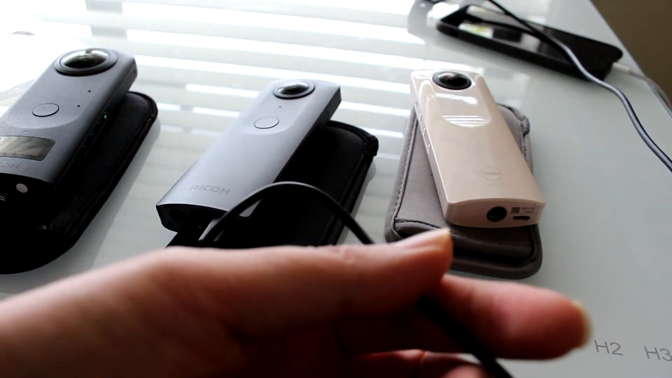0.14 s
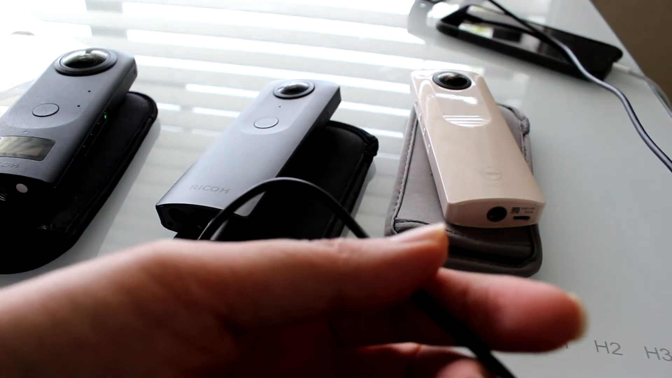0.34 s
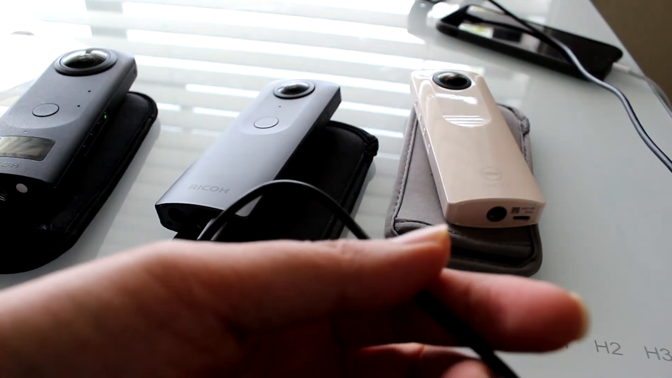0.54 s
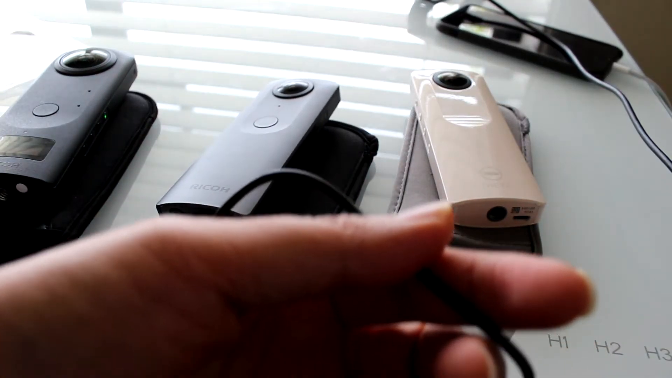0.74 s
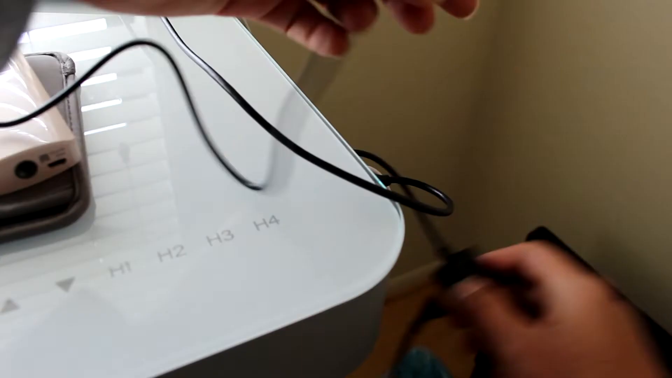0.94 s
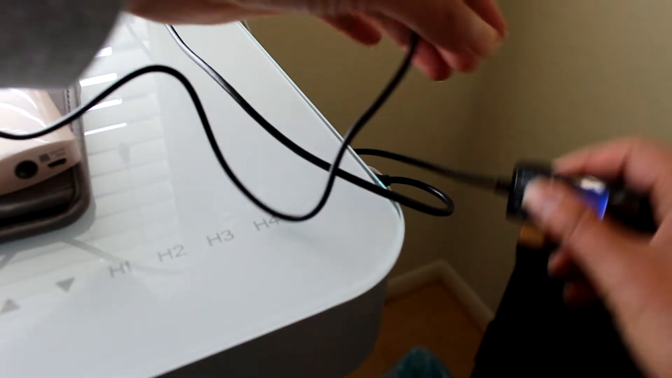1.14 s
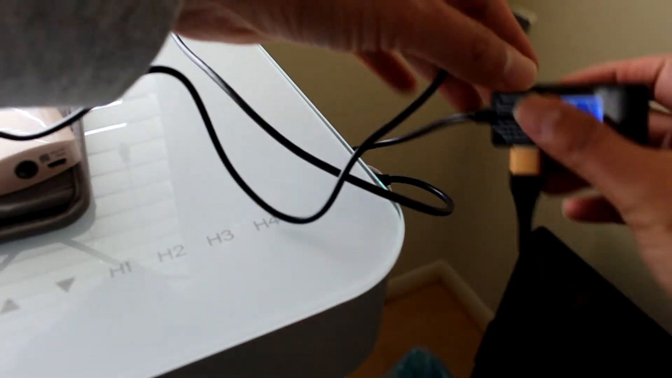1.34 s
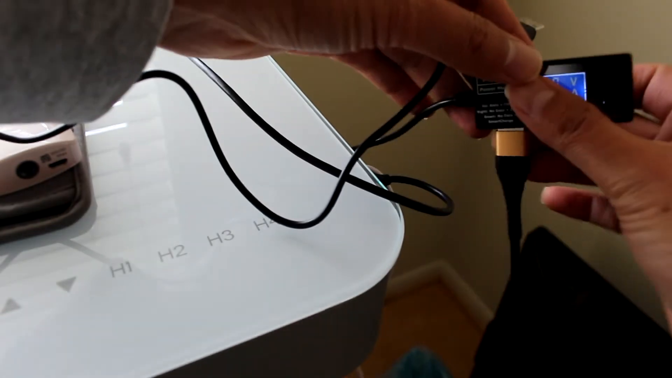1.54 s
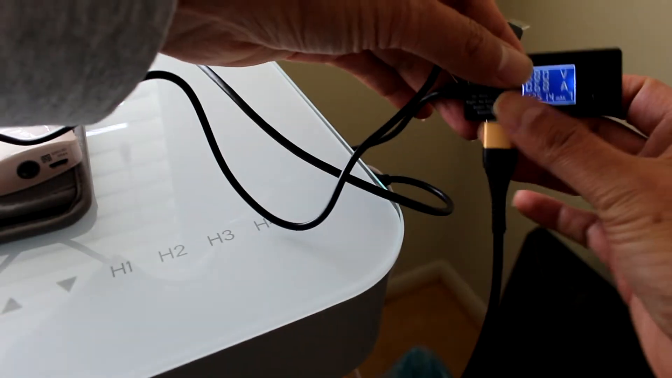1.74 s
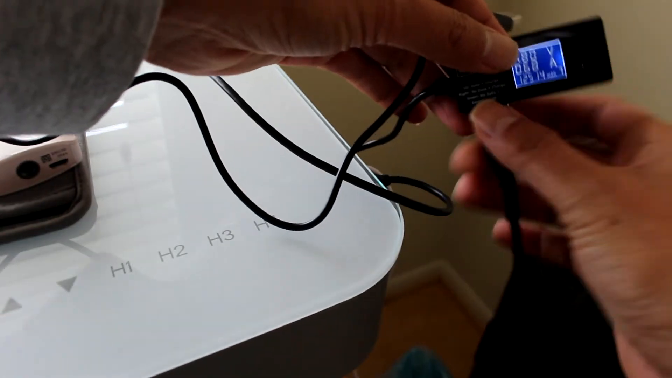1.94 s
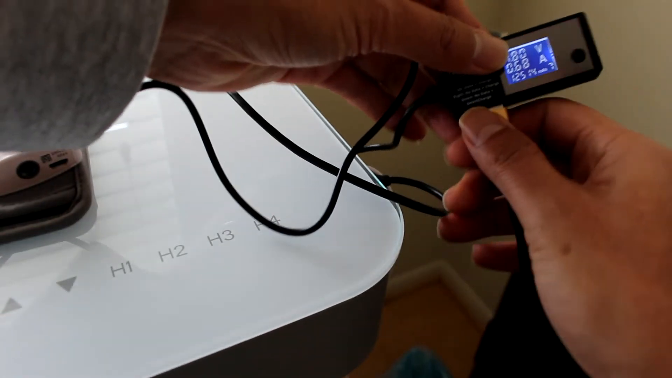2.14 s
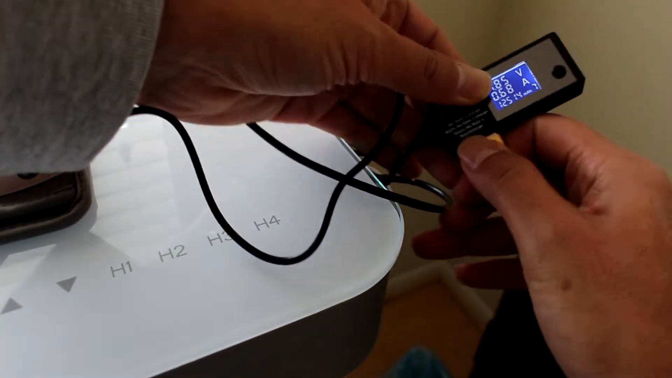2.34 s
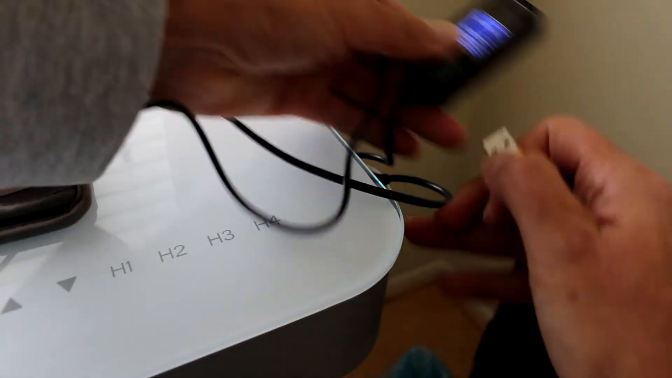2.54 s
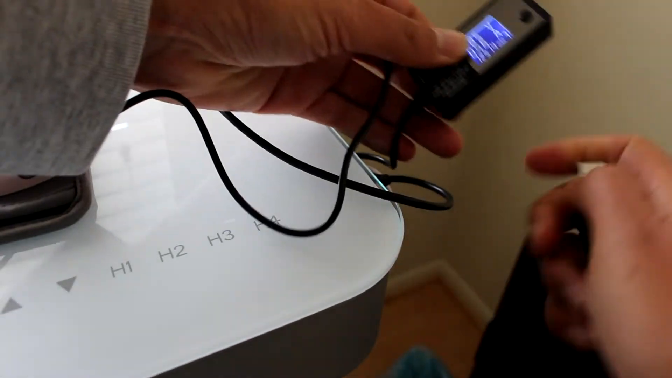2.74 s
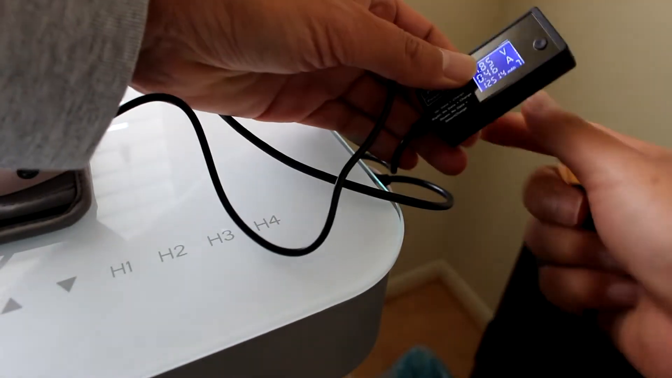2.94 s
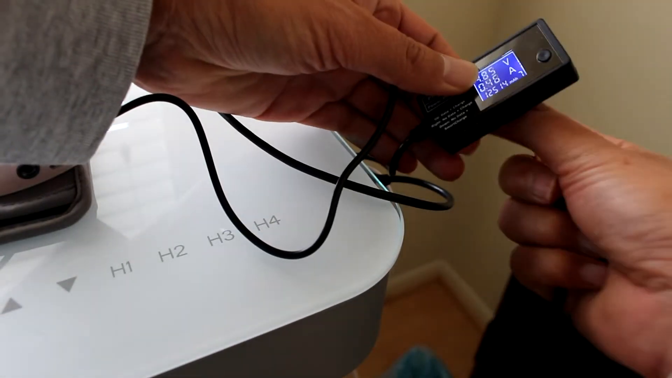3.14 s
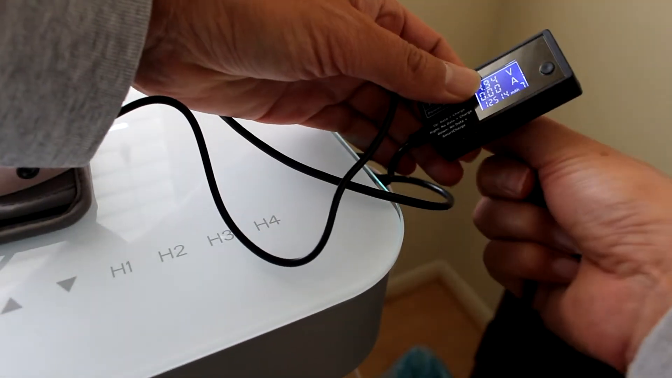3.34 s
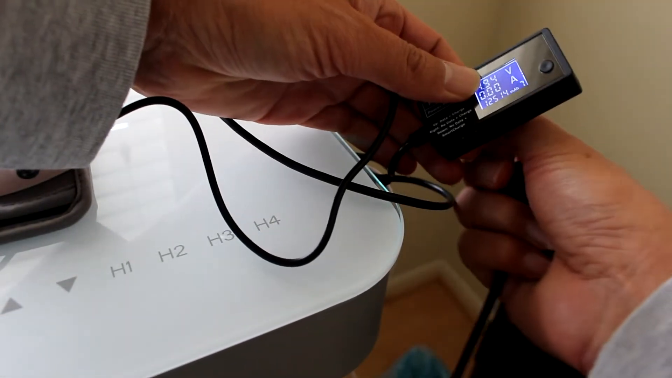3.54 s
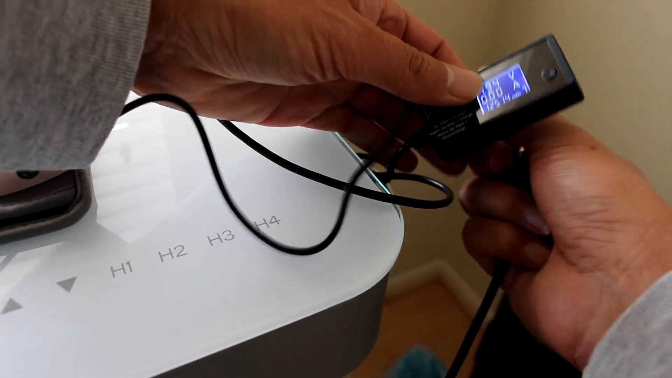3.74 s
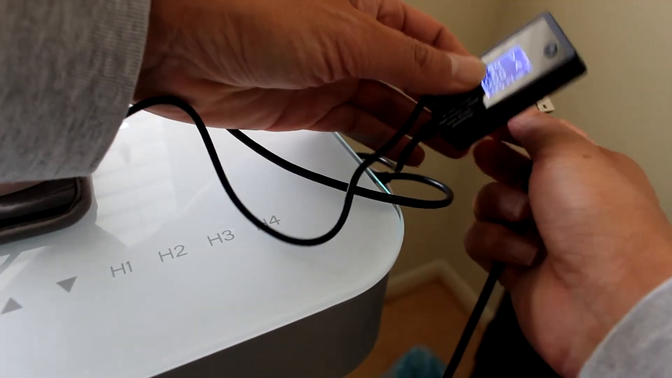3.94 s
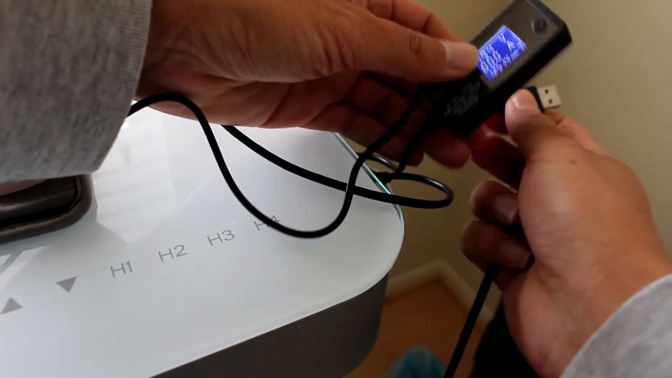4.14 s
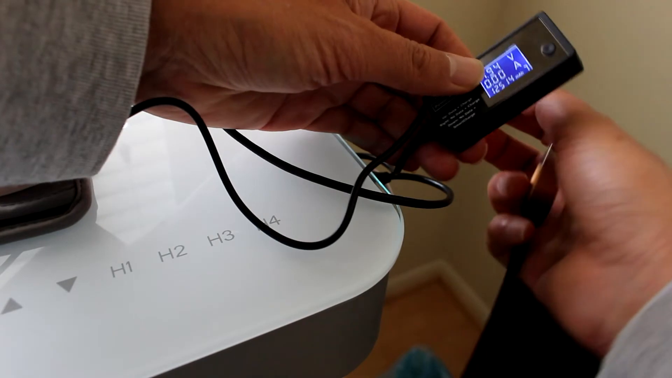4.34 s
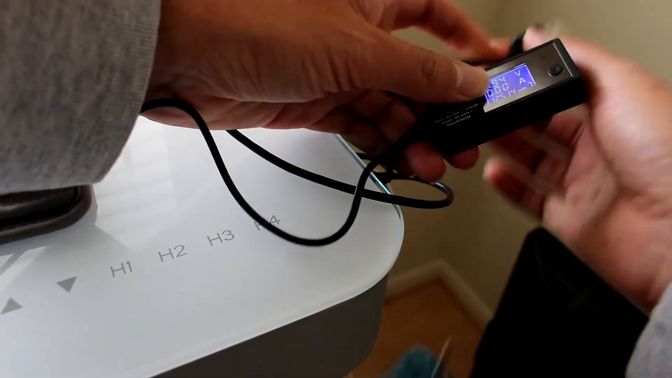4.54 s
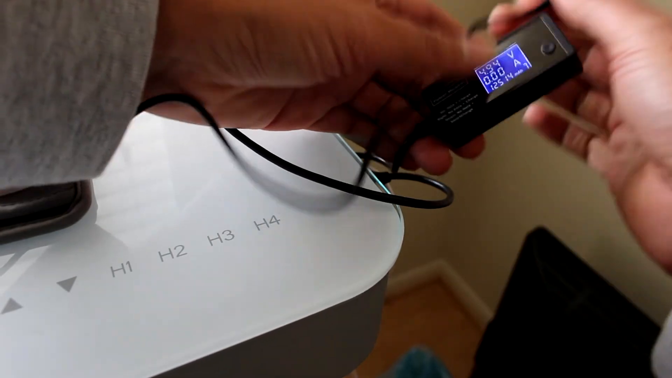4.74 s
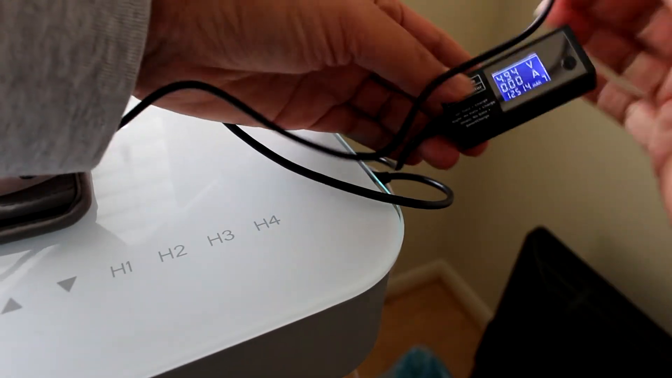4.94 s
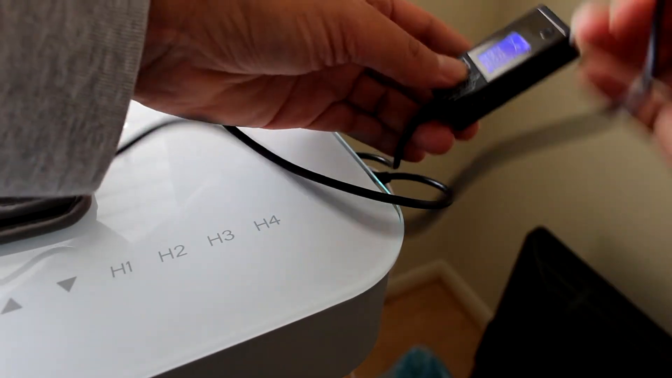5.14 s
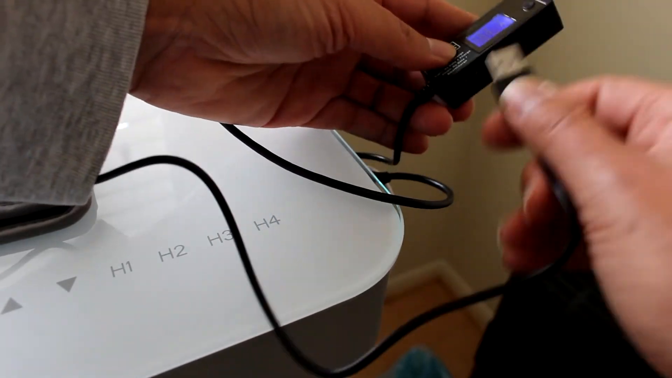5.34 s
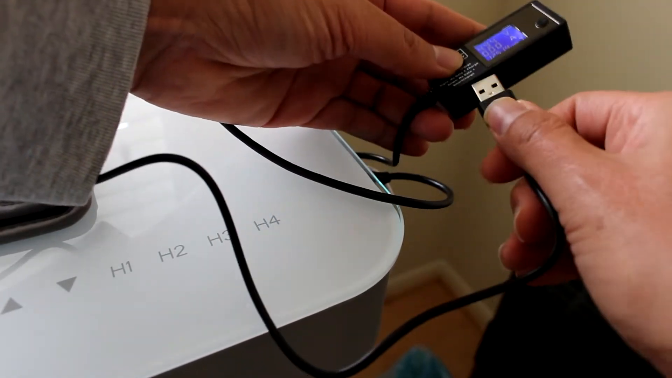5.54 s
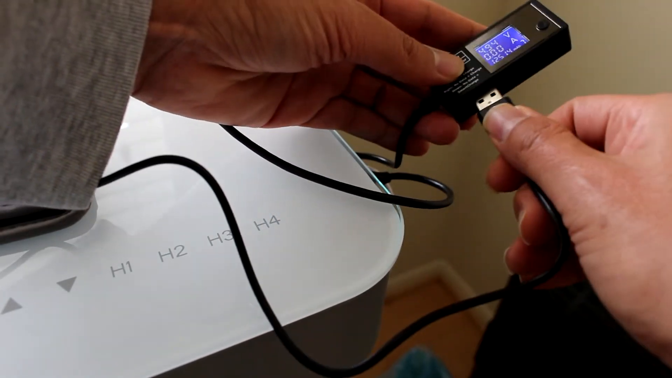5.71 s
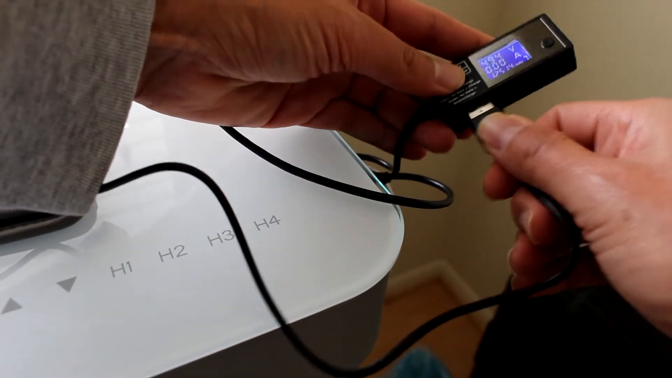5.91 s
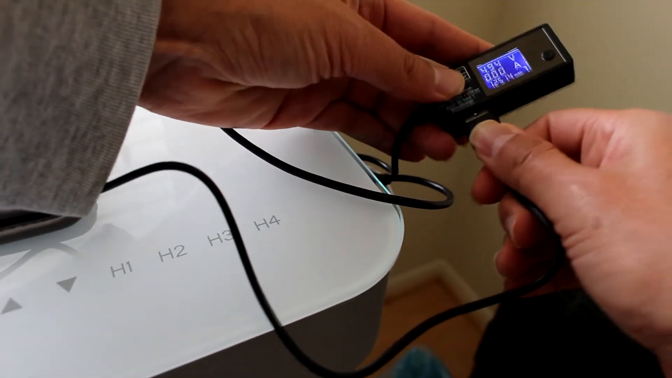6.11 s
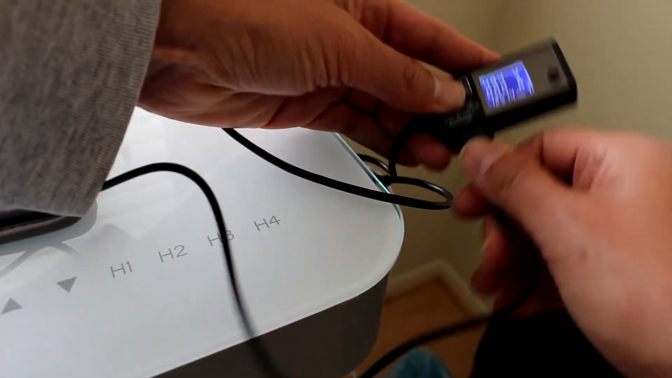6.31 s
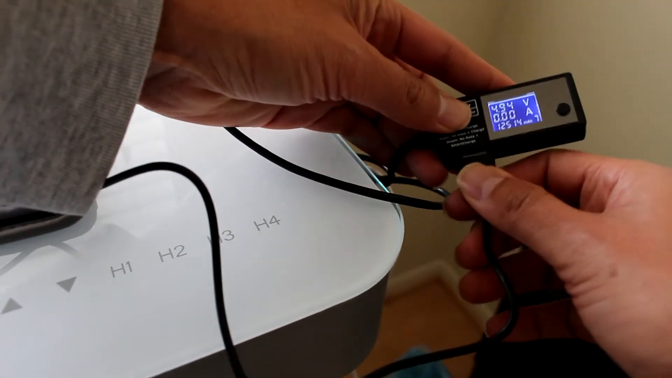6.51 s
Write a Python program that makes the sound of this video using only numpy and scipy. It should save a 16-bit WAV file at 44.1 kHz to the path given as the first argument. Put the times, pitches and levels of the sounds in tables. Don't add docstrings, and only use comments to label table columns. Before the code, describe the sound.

In a quiet, hard-walled room, a plug clicks and scrapes on a plastic shell while its loose cable slaps and drags across a glass table.

```python
import sys
import numpy as np
from scipy import signal
from scipy.fft import rfft, irfft, next_fast_len
from scipy.io import wavfile
from scipy.ndimage import map_coordinates

SR = 44100
rng = np.random.default_rng(int(sys.argv[2]) if len(sys.argv) > 2 else 0)


def store_wav(level_fs):
    pcm = np.round(np.clip(np.atleast_2d(level_fs), -1, 1) * 32767)
    wavfile.write(sys.argv[1], SR, pcm.T.astype(np.int16))


def to_linear_factor(level_db):
    exponent = np.asarray(level_db, float) / 20
    return 10 ** exponent


N = 294147

# (centre [Hz], width [Hz], level [dB])
EDGE_CRACK = [(5150, 16000, 51), (11100, 16000, -2.5), (12300, 850, -38)]
# (centre [Hz], width [Hz], level [dB])
TABLE_THUD = [(145, 127, 5), (340, 570, 4.5)]
# (frequency [Hz], likeness [0-1])
ROOM_LIKENESS = [(200, 0.98), (1500, 0.68), (4000, 0.54), (10000, 0.037)]


def unit(x):
    return x / np.sqrt(np.mean(x ** 2) + 1e-20)


def with_peak(x, db):
    return to_linear_factor(db) * x / np.abs(x).max()


def noise(*shape):
    return rng.standard_normal(shape)


def along(points, hz):
    f, v = np.transpose(points)
    return np.interp(np.log(hz + 1), np.log(f + 1), v)


def wobble(rate):
    return map_coordinates(noise(int(N * rate / SR) + 4), [np.arange(N) * rate / SR])


def filtered(x, response):
    m = next_fast_len(x.shape[-1] + 8192)
    spectrum = rfft(x, m) * response(np.fft.rfftfreq(m, 1 / SR))
    return irfft(spectrum, m)[..., :x.shape[-1]]


def modes(rows):
    def response(f):
        total = 0
        for k, (centre, width, db) in enumerate(rows):
            damping = 1j * f * width
            total = total + (-1) ** k * to_linear_factor(db) * damping / (centre * centre - f * f + damping)
        return total
    return response


def peaked(x, rows, db):
    return with_peak(filtered(x, lambda f: modes(rows)(f) ** 2), db)


def causal(x, points, tilt_db, db):
    hz = np.fft.rfftfreq(2048, 1 / SR)
    colour_db = along(points, hz) + tilt_db * np.log2(hz / 2000 + 0.068)
    cepstrum = irfft(np.log(to_linear_factor(np.maximum(colour_db, -90))))
    cepstrum[1:1024] *= 2
    cepstrum[1025:] = 0
    impulse = irfft(np.exp(rfft(cepstrum)))
    return with_peak(signal.fftconvolve(x, impulse)[:len(x)], db)


def dulled(x, db):
    top_hz = 19000 * to_linear_factor(0.15 * max(db, -30))
    return filtered(x, lambda f: 1 / (1 + 1j * f / top_hz * 1.94 - (f / top_hz) ** 2) ** 2)


def pair(x, likeness, gain=lambda hz: 1):
    def mid_side_gain(hz):
        turn = np.arccos(np.clip(along(likeness, hz), 0, 1)) / 2
        return gain(hz) * np.array([np.cos(turn), np.sin(turn)])
    mid, side = filtered(x, mid_side_gain)
    return np.array([mid + side, mid - side])


def add(out, s, hit, pan_db, lag, walls_db, room_db):
    # (delay [s], left [dB], right [dB])
    reflections = [(.0035, -11, -12), (.007, -9, -10), (.014, -13, -13), (.022, -12, -13), (.040, -17, -16),
                   (.045, -16, -17)]
    # (frequency [Hz], time to fall 60 dB [s])
    decay = [(200, 0.62), (1000, 0.79), (2500, 0.64), (6000, 0.72), (12000, 0.34)]
    span = 30000
    hz, t, z = signal.stft(noise(2, span), SR, nperseg=256)
    fading = z * to_linear_factor(-60 * t / along(decay, hz)[:, None])
    tail = signal.istft(fading, SR, nperseg=256)[1][:, :span]
    t = np.arange(span) / SR
    far_wall = 1 + 1.3 * to_linear_factor(walls_db) * (t > .038) * np.exp(-np.abs(t - .038) / .05)
    tail = pair(tail, ROOM_LIKENESS) * (1 - np.exp(-t / .01)) * far_wall
    tail = to_linear_factor(room_db) * tail / np.linalg.norm(tail[0])
    echoes = np.zeros((2, span))
    for delay, *side_db in reflections:
        echoes[:, round(delay * SR)] = to_linear_factor(np.array(side_db) + walls_db)
    echoes = filtered(echoes, lambda f: 1 / (1 + 1j * f / 4000))
    arrival = 8 + np.array([[lag], [-lag]]) / 2
    direct = np.sinc(np.arange(span) - arrival) * to_linear_factor(np.array([[pan_db], [-pan_db]]) / 2)
    heard = signal.fftconvolve(hit[None], direct + echoes + tail, axes=1)
    place = out[:, round(s * SR):][:, :span]
    place += heard[:, :place.shape[1]]


def snaps():
    # (time [s], peak [dB], shell tone [Hz], crack [dB], upper mode [dB])
    blows = [(1.0657, -42, 2370, -12, -4), (1.937, -23, 2020, -14.5, -28), (3.0481, -34, 1680, -17, -21),
             (3.845, -32.5, 1760, 9, 1), (4.5213, -36.5, 1470, -14, 4), (5.06, -19, 1500, -1.5, 3.5),
             (5.579, -54, 1600, 9, -13), (5.206, -26.5, 1750, -6, -30), (5.6079, -17.5, 1800, -22, -22),
             (5.629, -39, 1890, 6, -2), (5.6587, -19, 2040, -20, -20), (5.8046, -21.5, 2280, -0.5, 4),
             (5.8672, -6, 1900, -13.5, -14), (6.1877, -5.5, 2000, -7, -6)]
    out, t = np.zeros((2, N)), np.arange(2048) / SR
    for s, db, hz, crack_db, upper_db in blows:
        push = to_linear_factor(-60 * t / .0015) * (1 + .2 * noise(len(t)))
        shell = peaked(push, [(0.672 * hz, 0.37 * hz, -6), (hz, 0.69 * hz, 0)], db)
        upper = peaked(push, [(3470, 930, 0)], db + upper_db)
        wall_modes = [(910, 180, 7), (1500, 280, 4.0), (2130, 1050, 12.5), (3800, 1200, upper_db + 7)]
        ring = peaked(to_linear_factor(-60 * t / 0.041) * noise(len(t)), wall_modes, db - 10)
        burst = dulled(to_linear_factor(-60 * t / 0.0092) * noise(len(t)), db)
        crack = peaked(burst, EDGE_CRACK, db + crack_db)
        add(out, s, shell + upper + ring + crack, pan_db=-2.5, lag=0.76, walls_db=-3.0, room_db=-11)
    return out


def scrapes():
    # (time of the crest [s], peak [dB], shell tone [Hz], crack [dB])
    rubs = [(.328, -45.5, 1920, -24), (.84, -48, 2480, -22), (0.927, -45.5, 1920, -26),
            (0.964, -43, 2170, -20), (1.033, -43, 1700, -24), (2.705, -49, 10800, -13),
            (2.719, -48, 10400, -20.1), (2.815, -50, 9800, -18), (2.891, -49, 9050, -5),
            (6.182, -30, 2170, -8), (1.7903, -43.5, 4520, -16), (1.794, -43, 2700, -20.1),
            (1.7977, -41.5, 1400, -13), (1.8644, -41.5, 2000, -14.5), (2.0083, -38, 2050, -14),
            (2.03, -21.5, 2050, -25.5), (6.0113, -36, 8500, -7), (6.0195, -25.5, 2490, -8.5)]
    rise_s, fall_s = 0.0023, 0.0079
    out, t = np.zeros((2, N)), np.arange(4096) / SR - 1300 / SR
    swell = np.exp(-np.abs(t) / np.where(t < 0, rise_s, fall_s))
    for s, db, hz, crack_db in rubs:
        friction = swell * noise(2, len(t))
        shell = peaked(friction[0], [(hz, .33 * hz, 0)], db)
        crack = peaked(dulled(friction[1], db), EDGE_CRACK, db + crack_db + 6)
        add(out, s + t[0], shell + crack, pan_db=-3.0, lag=0.76, walls_db=-7, room_db=-13.0)
    return out


def slaps(rows, colour, pan_db, usual_db, thud_db):
    out, t = np.zeros((2, N)), np.arange(6000) / SR
    for s, db, treble_db, length, room_db in rows:
        clump = (1 - np.exp(-t / 0.00062)) * np.exp(-(t / length) ** 1.29)
        grit = clump * noise(2, len(t)) * to_linear_factor(2.9 * rng.exponential(size=(2, len(t))))
        tilt_db = (treble_db - usual_db) / 2
        contact = causal(grit[0], colour, tilt_db, db - 2)
        thud = peaked(grit[1], TABLE_THUD, db + thud_db)
        add(out, s, contact + thud, pan_db, lag=.65, walls_db=-6, room_db=room_db)
    return out


def cable_slaps():
    # (time [s], peak [dB], treble [dB], length [s], room [dB])
    on_case = [
        (1.292, -13, -12, 0.022, -9),
        (1.33, -24, -8, 0.024, -1.2),
    ]
    on_socket = [
        (2.439, -28, -22, 0.018, -2),
        (2.537, -15.5, -16, 0.0047, -3),
        (2.548, -12, -8, 0.0049, -12),
        (2.553, -16, -8, 0.0063, -20),
    ]
    on_edge = [
        (0.624, -43, -11, 0.012, -1.1),
        (3.756, -24.5, -18, 0.0073, -2),
        (3.767, -21, -21, 0.012, -13),
        (3.794, -32, -32, 0.0034, -19),
        (5.306, -21.5, -13.5, 0.0073, -3.5),
        (5.314, -27.5, -10, 0.02, -7.5),
    ]
    on_rim = [
        (4.566, -23, -10.5, 0.028, -4.5),
        (4.617, -22.5, -14, 0.011, -2),
        (4.654, -29, -27, 0.0055, -1.1),
        (4.692, -15.5, -14.5, 0.021, -5),
        (4.735, -18.5, -5.5, 0.0068, -6),
        (4.744, -16.5, -9, 0.0071, -25),
        (4.828, -25, -30, 0.0055, -21),
    ]
    on_table = [
        (4.858, -16, -17, 0.014, -2.5),
        (4.909, -12, -12, 0.0035, -9),
        (4.917, -21, -12, 0.0038, 8),
        (4.936, -3, -12, 0.0074, -2.5),
        (4.943, -8.5, -15, 0.013, -7.5),
        (4.979, -15, -17, 0.0087, -7),
        (5.039, -14.5, -21.5, 0.017, -4.5),
        (5.056, -22.5, -20, 0.026, -2),
    ]
    # (frequency [Hz], density [dB per Hz])
    case = [(120, -42), (200, -21), (300, -4), (660, -19), (1200, -6.5), (1770, -11), (2560, -3.5),
            (2950, -11), (3300, 1.5), (4500, -3), (5300, -11.5), (9800, -8.5), (11000, -17), (16500, -39)]
    socket = [(120, -33), (200, -22.5), (844, -14), (1020, -10), (1290, -11.5), (2370, -6.5), (2650, -11.5),
              (3560, -7.5), (4970, -17), (7190, -12.5), (12300, -23.5), (15600, -35), (16500, -63)]
    edge = [(120, -44), (200, -11.5), (689, -0.5), (1130, -1), (1340, 3.5), (1730, 2.5), (2290, 4.5),
            (2460, 1), (8490, -23.5), (15600, -48), (16500, -75)]
    rim = [(180, -25), (300, -10), (577, -24), (705, -6.5), (1040, 4), (1530, -8), (1600, -8), (2790, -7),
           (3140, -7.5), (4610, -9.5), (5370, -19), (7630, -17.5), (12000, -31), (15700, -44), (16500, -73)]
    table = [(180, -45), (300, -20), (355, -14.5), (464, -32), (513, -20), (923, -12), (1230, -4.5),
             (2320, -8.5), (2890, -4.5), (3650, -14.5), (4170, -19.5), (7760, -15), (8730, -11.5),
             (14400, -18.5), (16500, -44)]
    out = slaps(on_case, case, pan_db=-.4, usual_db=-10.5, thud_db=-26.5)
    out += slaps(on_socket, socket, pan_db=-2.4, usual_db=-14, thud_db=-38)
    out += slaps(on_edge, edge, pan_db=.6, usual_db=-20, thud_db=-26)
    out += slaps(on_rim, rim, pan_db=0.33, usual_db=-15, thud_db=-29)
    out += slaps(on_table, table, pan_db=-1.7, usual_db=-8, thud_db=-18)
    return out


def drag():
    # (time [s], rattle [dB], rumble [dB])
    pull = [
        (4.5, -76, -63),
        (4.61, -53.5, -44.5),
        (4.74, -39, -40),
        (4.888, -34.5, -40),
        (4.978, -36, -35),
        (5.092, -41.5, -73),
        (5.3, -58, -60),
    ]
    # (centre [Hz], width [Hz], level [dB])
    resonances = [(1034, 46, 4.5), (1170, 110, -5), (2000, 310, -4.5), (3230, 310, 3), (4360, 540, 1.5),
                  (5870, 1300, -4), (8900, 1800, -16.5)]
    s, rattle_db, rumble_db = np.transpose(pull)
    t = np.arange(N) / SR
    rattle = to_linear_factor(np.interp(t, s, rattle_db, -120, -120))
    rumble = to_linear_factor(np.interp(t, s, rumble_db, -120, -120))
    grains = noise(2, N) * to_linear_factor(3 * rng.exponential(size=N) + 5 * wobble(50))
    top = unit(pair(grains, ROOM_LIKENESS, modes(resonances)))
    uneven = noise(2, N) * to_linear_factor(3 * wobble(25))
    low = unit(pair(uneven, ROOM_LIKENESS, lambda f: modes(TABLE_THUD)(f) ** 2))
    return rattle * top + rumble * low


def thumps():
    # (time [s], peak [dB], tone [Hz], length [s])
    contacts = [(0.952, -35.5, 213, 0.0075), (0.967, -36, 275, 0.0064), (1.3, -39, 320, 0.0095),
                (1.405, -39, 547, 0.014), (1.426, -36.5, 317, 0.012), (2.54, -41.5, 172, 0.051),
                (1.302, -42, 139, 0.023), (4.698, -24.5, 137, 0.008), (4.852, -23.5, 410, 0.012),
                (5.31, -35.5, 340, 0.018), (3.2, -47, 170, 0.02), (6.184, -32.5, 202, 0.0037)]
    out, t = np.zeros((2, N)), np.arange(4096) / SR
    for s, db, hz, length in contacts:
        push = t / length * np.exp(-t / length * 2) * noise(len(t))
        body = peaked(push, [(hz, 0.77 * hz, 0), (620, 300, -1)], db)
        add(out, s, body, pan_db=2.0, lag=0, walls_db=-28, room_db=-7)
    return out


def squeaks():
    # (time [s], pitch [Hz], level [dB])
    glides = [
        [(.32, 3390, -75), (.33, 3300, -59.5), (.39, 3410, -63.5), (.52, 3510, -70.5)],
        [(3.95, 4160, -74), (4.12, 4500, -68), (4.15, 5330, -80), (4.2, 5150, -63), (4.27, 5100, -75),
         (4.32, 5150, -82)],
    ]
    out, t = np.zeros(N), np.arange(N) / SR
    for rows in glides:
        s, hz, db = np.transpose(rows)
        turns = np.cumsum(np.interp(t, s, hz) + 200 * wobble(400)) / SR
        level_db = np.interp(t, s, db, -120, -120) + 4.5 + 1.5 * wobble(120)
        out += to_linear_factor(level_db) * np.sin(2 * np.pi * turns)
    return out


def sleeves():
    # (start [s], hold [s], rustle [dB])
    moves = [(0.0, 0.036, -66.5), (0.184, 0.06, -65), (0.328, .02, -69), (0.61, 0.014, -68),
             (0.988, 0.19, -59), (1.197, 0.1, -68), (1.068, 0.0078, -57), (2.635, 0.15, -67.5),
             (2.876, 0.0083, -73), (4.08, 0.035, -90), (4.49, .03, -64)]
    # (frequency [Hz], density [dB per Hz])
    cloth = [(500, -20), (1000, -3), (2000, 0), (5000, -3), (9000, -6), (12000, -12), (16000, -24)]
    rise_s, fall_s = 0.0058, 0.04
    t = np.arange(N) / SR
    level = np.zeros(N)
    for s, hold, db in moves:
        away = np.maximum((s - t) / rise_s, (t - s - hold) / fall_s)
        level += to_linear_factor(db) * np.exp(-np.maximum(away, 0))
    grains = noise(2, N) * to_linear_factor(1.8 * rng.exponential(size=N))
    grains = grains * to_linear_factor(.7 * wobble(40))
    return to_linear_factor(7.0) * level * unit(pair(grains, ROOM_LIKENESS, lambda f: to_linear_factor(along(cloth, f))))


def room_tone():
    # (frequency [Hz], density [dB per Hz])
    vent = [(12, -49), (20, -16), (179, -11), (244, -6), (265, -11.5), (289, -5), (428, -10), (506, -14),
            (551, -15.5), (839, -11.5), (1050, -13), (1650, -18), (11500, -34), (15200, -40.5),
            (16500, -49)]
    # (frequency [Hz], likeness)
    likeness = [(60, 0.32), (180, 0.62), (550, 0.39), (1650, 0.42), (4970, -1.7), (15000, -0.36)]
    # (frequency [Hz], rms level [dB])
    lines = [(60, -69), (242, -58), (301, -63), (361, -68.5), (422, -64.5), (441, -68), (479, -74.5),
             (539, -66.5), (899, -73.5), (1022, -66.5), (1200, -81.5), (1319, -69.5), (11950, -91)]
    air = unit(pair(noise(2, N), likeness, lambda f: to_linear_factor(along(vent, f))))
    air = to_linear_factor(-51 + 0.39 * wobble(6)) * air
    t = np.arange(N) / SR
    hum = np.zeros(N)
    for hz, db in lines:
        level = to_linear_factor(db + 3 + 0.36 * wobble(2.87))
        hum += level * np.sin(2 * np.pi * hz * t + 1.0 * wobble(6))
    return air + hum * to_linear_factor(np.array([[.4], [-.4]]))


def scene():
    plug = snaps() + scrapes()
    cable = cable_slaps() + drag()
    hands = thumps() + squeaks() + sleeves()
    return plug + cable + hands + room_tone()


def top_cut(x):
    return signal.sosfilt(signal.butter(12, 16820, fs=SR, output="sos"), x)


def record(dry):
    return top_cut(dry)


dry = scene()
out = record(dry)
store_wav(out)
```